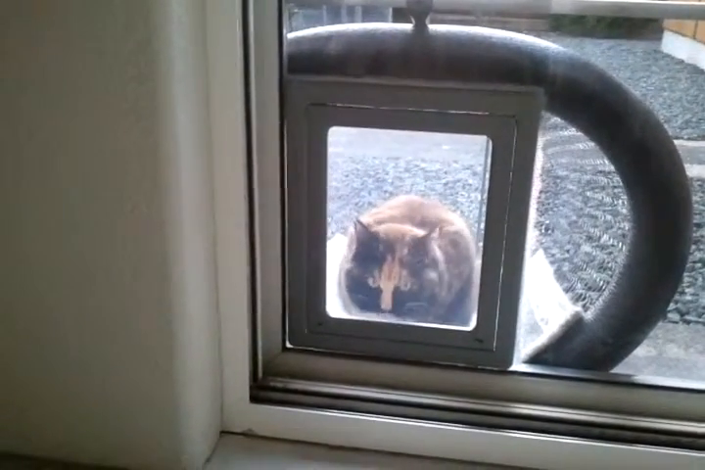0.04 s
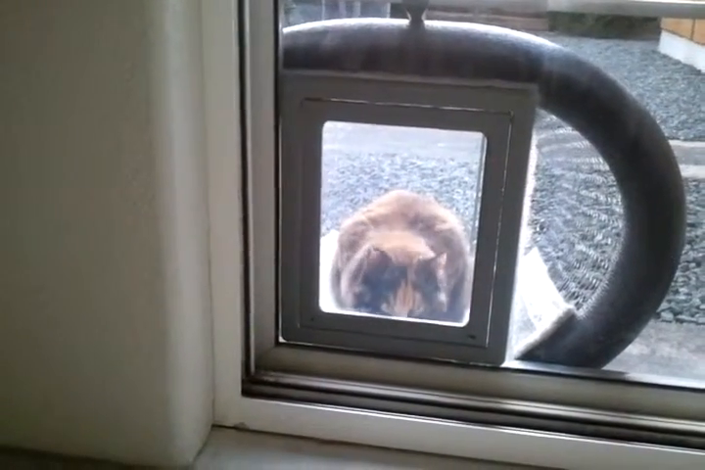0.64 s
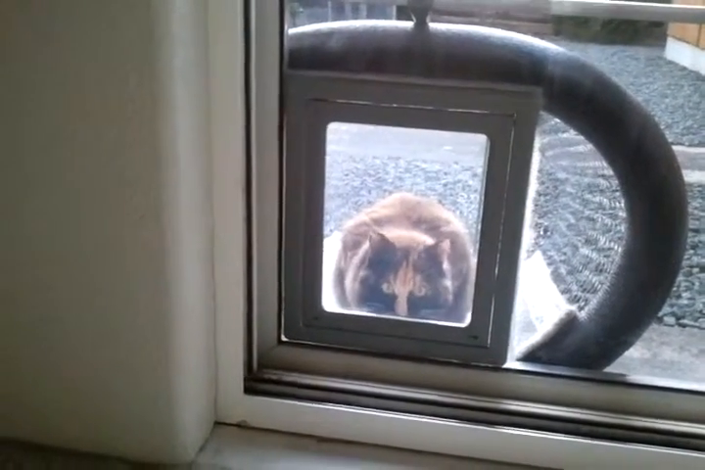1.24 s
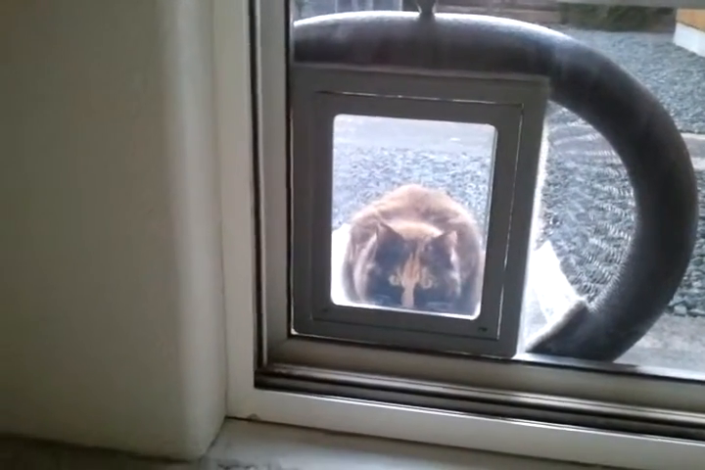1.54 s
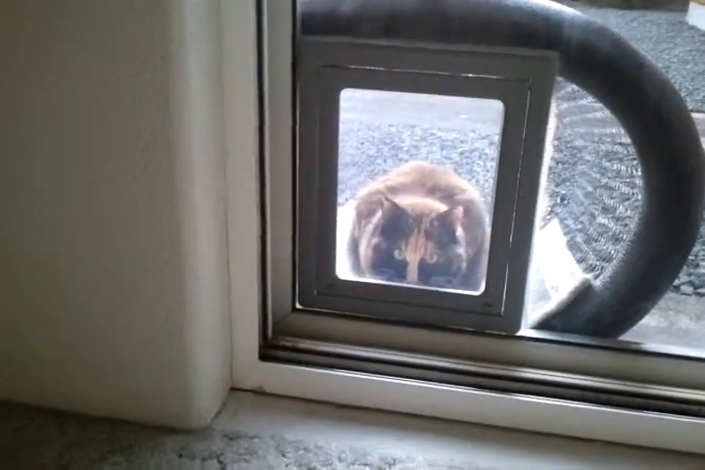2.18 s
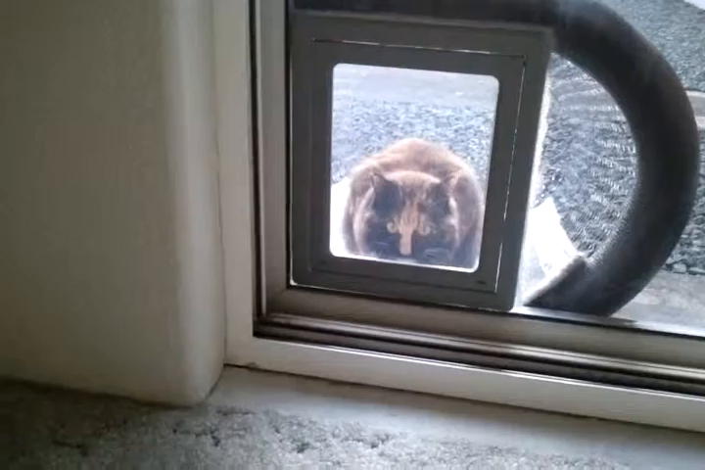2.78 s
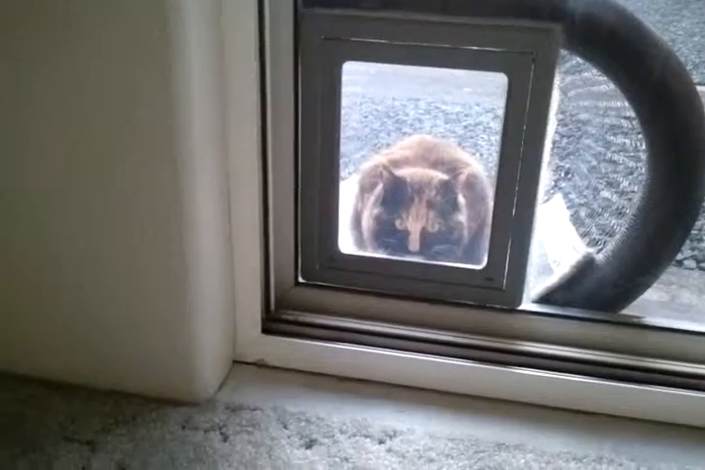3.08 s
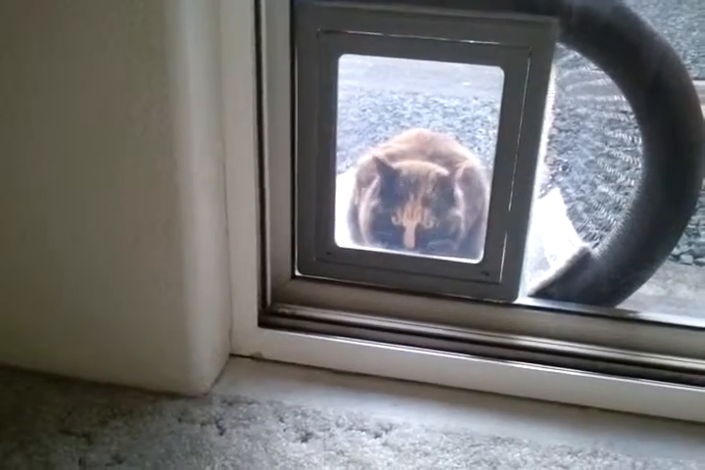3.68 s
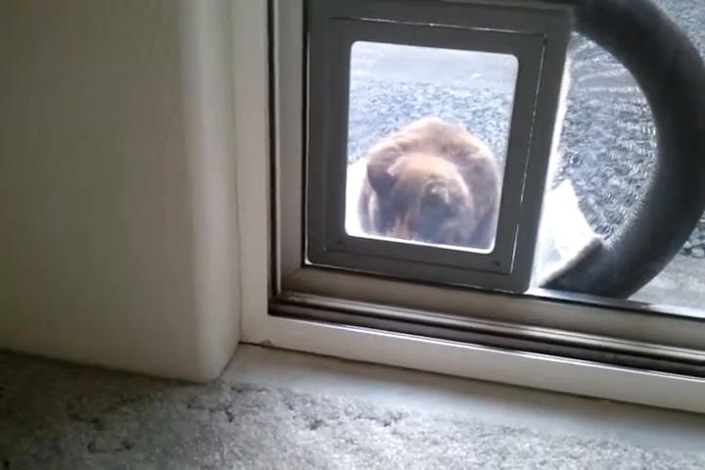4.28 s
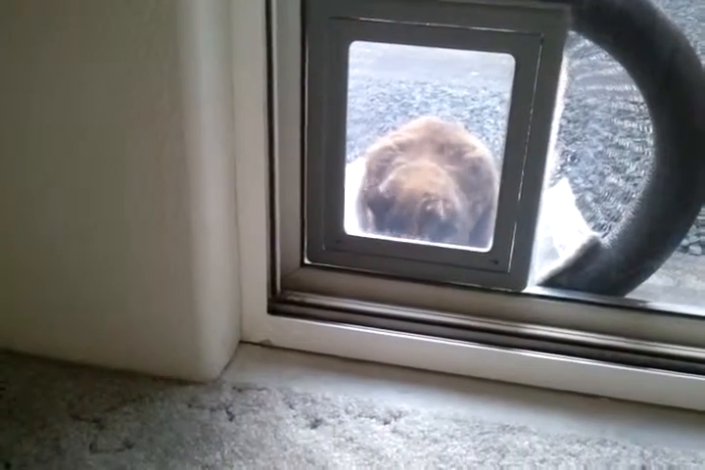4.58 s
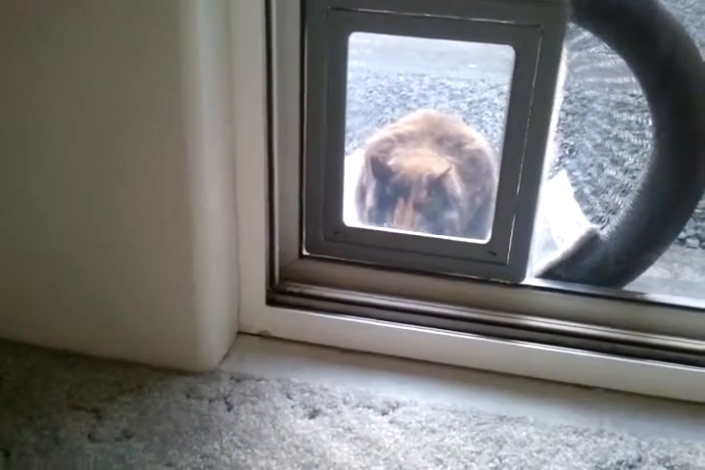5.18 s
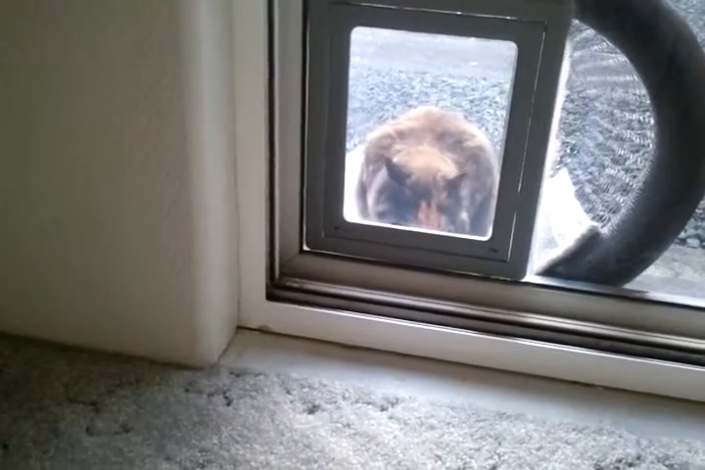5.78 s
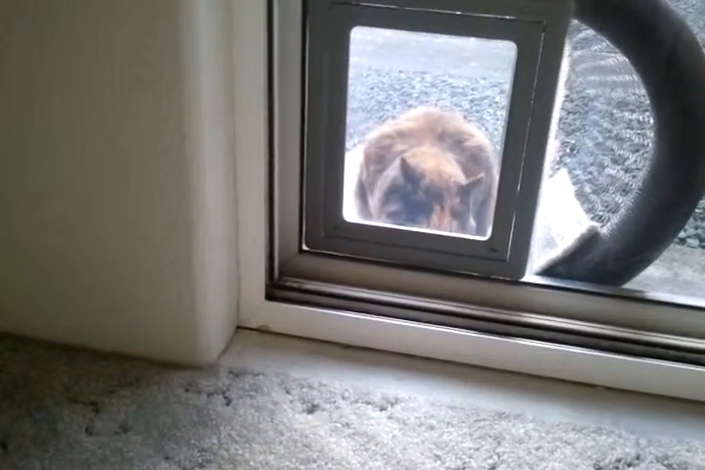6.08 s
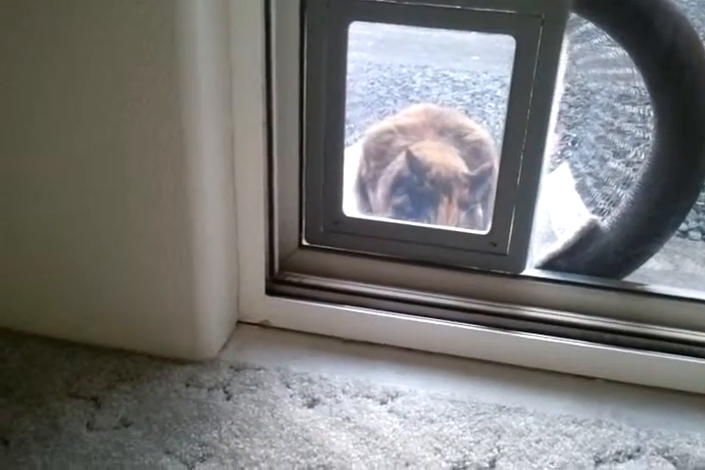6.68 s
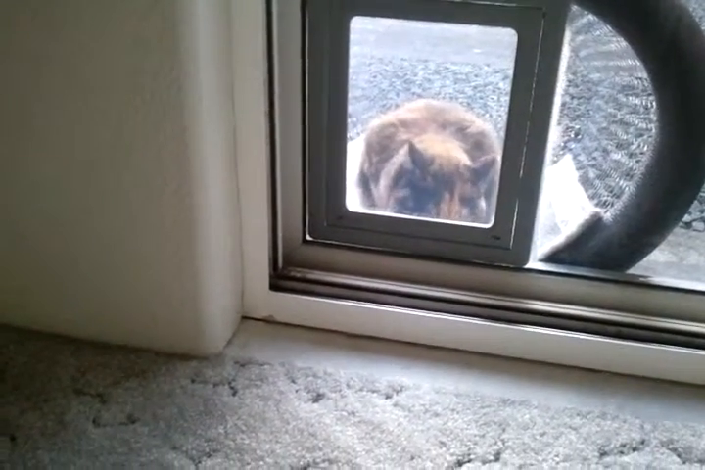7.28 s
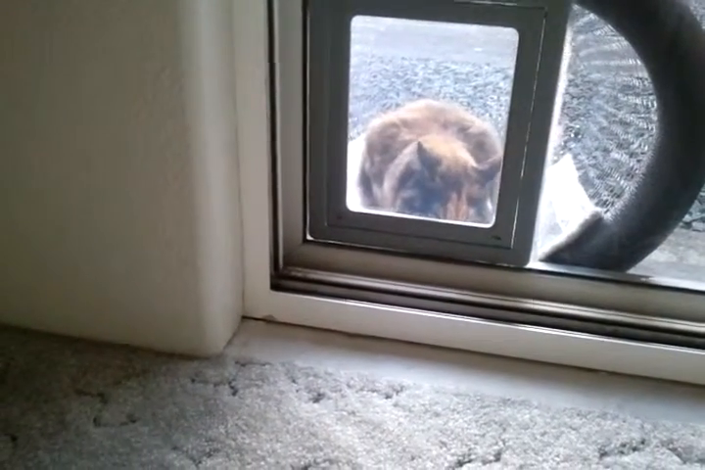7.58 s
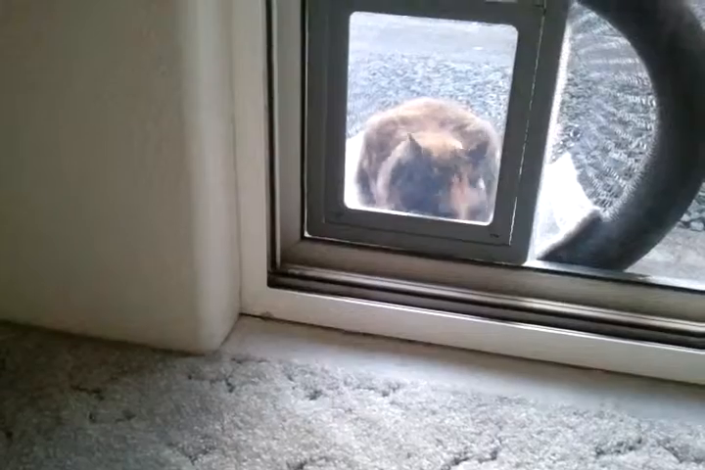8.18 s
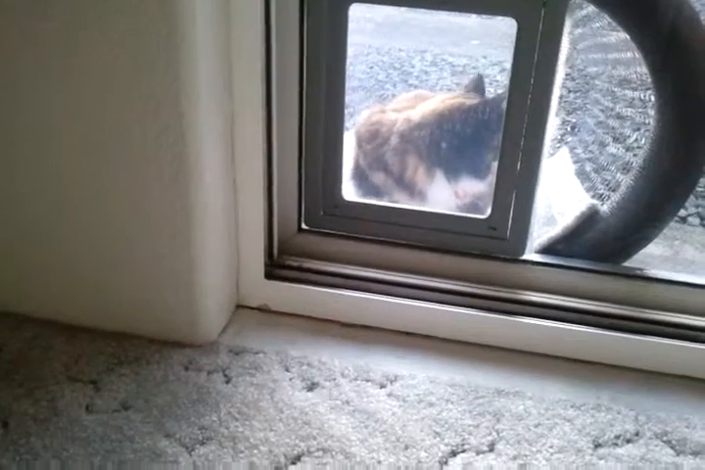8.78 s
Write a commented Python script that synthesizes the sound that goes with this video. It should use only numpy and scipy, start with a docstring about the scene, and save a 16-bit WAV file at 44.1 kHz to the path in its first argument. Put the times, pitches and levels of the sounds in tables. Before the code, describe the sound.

Dull outdoor rumble through a closed glass door in a quiet room, with steady microphone hiss and a few faint handling knocks and rustles.

```python
"""Dull outdoor rumble through a closed glass door fills the low modes of a quiet carpeted room.
A low drone stops after about a second; a faint hollow whirr sounds briefly over it.
Fingers shifting on the hand-held recorder make a few faint knocks, ticks and rustles.
The microphone hisses throughout."""
import sys
import numpy as np
from scipy import signal
from scipy.fft import rfft, irfft, next_fast_len
from scipy.io import wavfile

SR = 44100
rng = np.random.default_rng(int(sys.argv[2]) if len(sys.argv) > 2 else 0)


def generate_wav(signal):
    """Clip the signal to [-1, 1] and save it as 16-bit WAV at the path in sys.argv[1]."""
    frames = np.transpose(np.atleast_2d(signal))
    scaled = np.clip(frames, -1, 1) * 32767
    pcm = np.round(scaled).astype(np.int16)
    wavfile.write(sys.argv[1], SR, pcm)


N = 399105


def room_rumble(split_hz=260, raised_db=2, settle_s=1, wander_db=1.66, swells_per_s=1.5):
    """Outdoor noise and the modes it excites; settles, then ebbs while the bass wanders."""
    # spectrum through the door: (frequency [Hz], density [dB per Hz])
    spectrum = [(12, -72.5), (30, -71.5), (62, -80.5), (100, -88), (170, -80), (270, -86.5), (420, -88),
                (650, -91), (1000, -93.5), (1400, -101), (2500, -107), (6000, -120)]
    # room and glass resonances: (centre [Hz], width [Hz], peak density [dB per Hz])
    modes = [(40.7, 7.36, -65), (79.8, 12, -72.5), (116.3, 6.2, -73), (133, 13.3, -71.5),
             (170.8, 20, -79.5), (203.2, 17.4, -77.5), (237.7, 11, -79.5), (296, 18, -86.5),
             (356.3, 22, -83), (454.3, 20, -88), (515.4, 24, -93.5), (571.4, 45, -92), (838, 80, -93.5),
             (1086, 37, -96), (1507, 160, -106)]
    bass_ebb_db_per_s, upper_ebb_db_per_s = 0.11, 0.0742
    t = np.arange(N) / SR
    air = coloured(spectrum) + resonant_noise(modes)
    bass = signal.sosfiltfilt(signal.butter(2, split_hz, fs=SR, output="sos"), air)
    bass_gain = from_db(0.5 - bass_ebb_db_per_s * t + wander_db * wander(swells_per_s))
    upper_gain = from_db(-0.15 - upper_ebb_db_per_s * t)
    settling = from_db(raised_db * np.exp(-t / settle_s))
    return settling * (bass * bass_gain + (air - bass) * upper_gain)


def drone(gain_db=-3.0, end_s=1.145, fade_s=0.039):
    """Rough low drone of narrow noise bands; stops with a quick fade."""
    # drone bands: (centre [Hz], width [Hz], peak density before gain [dB per Hz])
    bands = [(85, 6.9, -68.5), (153.4, 19, -71.5), (204.2, 15.6, -66)]
    gate = np.clip((end_s - np.arange(N) / SR) / fade_s + .5, 0, 1)
    return from_db(gain_db) * gate * resonant_noise(bands)


def whirr(gain_db=2.5, start_s=0.19, end_s=0.827, fade_s=0.052):
    """Faint hollow whirr: narrow resonances sounding together."""
    # whirr bands: (centre [Hz], width [Hz], peak density before gain [dB per Hz])
    bands = [(688, 20, -88.5), (727, 28, -85.5), (838, 36, -87), (960, 6.8, -87.5), (1094, 14, -91),
             (1124, 7.4, -92)]
    t = np.arange(N) / SR
    gate = np.clip(np.minimum(t - start_s, end_s - t) / fade_s, 0, 1)
    return from_db(gain_db) * gate * resonant_noise(bands)


def knocks(relax_s=0.00074, lowpass_hz=3000, bounce_s=.0013, bounce_db=-8):
    """Each jolt reaches the microphone as a fast-relaxing pressure step with one bounce."""
    # knocks on the casing: (time [s], step level [dB])
    hits = [(2.1236, -34.5), (2.3187, -33.5), (2.635, -43)]
    jolts = np.zeros(N)
    for time_s, db in hits:
        jolts[round(time_s * SR)] += from_db(db)
        jolts[round((time_s + bounce_s) * SR)] += from_db(db + bounce_db)
    pressure = signal.lfilter([1], [1, -np.exp(-1 / (relax_s * SR))], jolts + 1e-18)
    return signal.sosfilt(signal.butter(2, lowpass_hz, fs=SR, output="sos"), pressure)


def ticks():
    """Each tiny slip rings the plastic casing for milliseconds."""
    # finger slips: (time [s], peak [dB], pitch [Hz], t60 [s])
    slips = [(0.712, -40.5, 3600, 0.0022), (.717, -51, 3400, .006), (.833, -46, 4950, 0.0054),
             (2.610, -55, 6040, 0.02), (7.380, -54.5, 6100, 0.013), (8.837, -50, 5150, .010),
             (8.993, -44.5, 5870, 0.0035)]
    out, t = np.zeros(N + SR), np.arange(SR // 10) / SR
    for time_s, db, hz, t60_s in slips:
        at = round(time_s * SR)
        decay = np.exp(-np.log(1000) * t / t60_s)
        out[at:at + len(t)] += from_db(db) * decay * np.sin(2 * np.pi * hz * t)
    return out[:N]


def rustles():
    """Friction noise in one broad resonance per slide, swelling and fading with finger pressure."""
    # finger slides: (start [s], length [s], centre [Hz], width [Hz], rms at crest [dB])
    slides = [(.712, 0.067, 2700, 1800, -62.5), (.79, 0.15, 5500, 2400, -74.5),
              (1.14, 0.37, 480, 99.4, -64.5), (1.15, 0.23, 3200, 2200, -77),
              (2.168, 0.008, 2700, 1800, -58.5), (2.27, 0.41, 1100, 1500, -67.5),
              (3.606, 0.15, 428, 120, -60.5), (5.118, 0.053, 906, 250, -62),
              (8.834, 0.019, 6100, 795, -62.5), (8.82, 0.072, 2690, 1190, -65),
              (8.844, .065, 6100, 1200, -74), (8.96, 0.058, 6200, 975, -72.5)]
    out, t = np.zeros(N), np.arange(N) / SR
    for start_s, length_s, hz, width_hz, db in slides:
        friction = resonate(resonate(white(), hz, width_hz), hz, width_hz)
        pressure = np.interp(t, [start_s, start_s + length_s / 2, start_s + length_s], [0, 1, 0])
        out += from_db(db) * np.sqrt(pressure) * friction / np.std(friction)
    return out


def hiss(gain_db=-0.26, raised_db=1.24, settle_s=1.0):
    """Microphone self-noise, slightly stronger at first."""
    # self-noise spectrum: (frequency [Hz], density before gain [dB per Hz])
    spectrum = [(100, -96.5), (1000, -101), (2000, -101.5), (3500, -102.6), (4600, -104.2), (5700, -104.4),
                (6150, -106), (6550, -110.5), (6900, -116), (7300, -126)]
    t = np.arange(N) / SR
    return from_db(gain_db + raised_db * np.exp(-t / settle_s)) * coloured(spectrum)


def from_db(db):
    """Decibels to gain."""
    return 10 ** (np.asarray(db) / 20)


def white():
    """Noise of unit power per Hz."""
    return rng.standard_normal(N) * np.sqrt(SR / 2)


def coloured(spectrum):
    """Steady noise, its spectrum interpolated over log frequency."""
    hz, level_db = np.transpose(spectrum)
    size = next_fast_len(N)
    bins_hz = np.maximum(np.arange(size // 2 + 1) * SR / size, 1)
    gain = from_db(np.interp(np.log(bins_hz), np.log(hz), level_db))
    return irfft(rfft(white(), size) * gain, size)[:N]


def resonate(x, hz, width_hz):
    """Two-pole resonance, unit peak gain."""
    r = np.exp(-np.pi * width_hz / SR)
    feedforward = np.array([1, 0, -1]) * (1 - r * r) / 2
    feedback = [1, -2 * r * np.cos(2 * np.pi * hz / SR), r * r]
    return signal.lfilter(feedforward, feedback, x)


def resonant_noise(bands):
    """Noise in narrow resonances; two passes keep the valleys deep."""
    return sum(from_db(db) * resonate(resonate(white(), hz, 2 * width_hz), hz, 2 * width_hz)
               for hz, width_hz, db in bands)


def wander(rate_per_s):
    """Slow random drift, spread about one."""
    position = np.arange(N) / SR * rate_per_s
    return np.interp(position, np.arange(128), rng.standard_normal(128))


def scene():
    """Room, handling and hiss at one microphone."""
    room = room_rumble() + drone() + whirr()
    handling = knocks() + ticks() + rustles()
    return (room + handling + hiss())[None, :]


def record(dry, cutoff_hz=7200, dc_offset=-.081):
    """Narrow-band recorder; its converter rests slightly below zero."""
    lowpass = signal.ellip(10, .1, 70, cutoff_hz, fs=SR, output="sos")
    return signal.sosfilt(lowpass, dry) + dc_offset


dry = scene()
out = record(dry)
generate_wav(out)
```